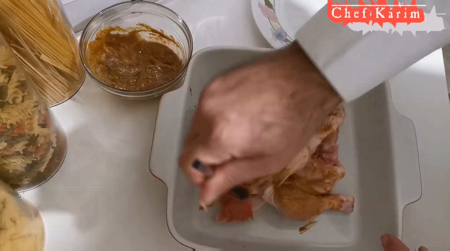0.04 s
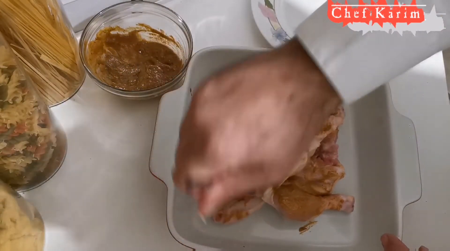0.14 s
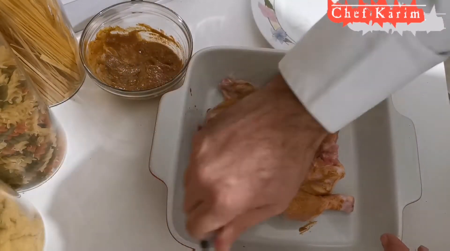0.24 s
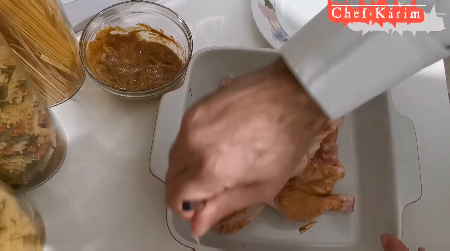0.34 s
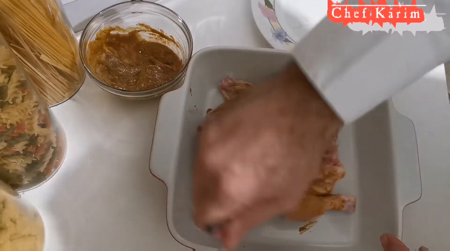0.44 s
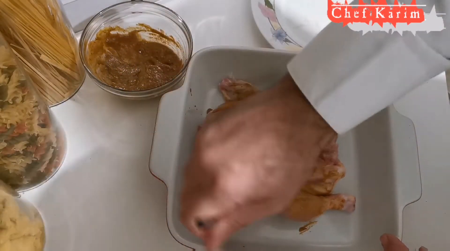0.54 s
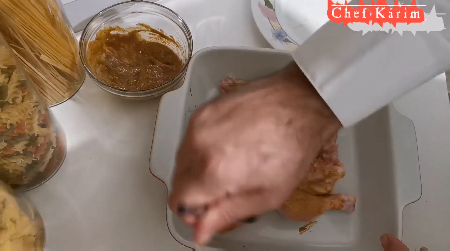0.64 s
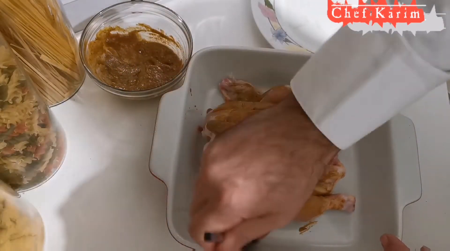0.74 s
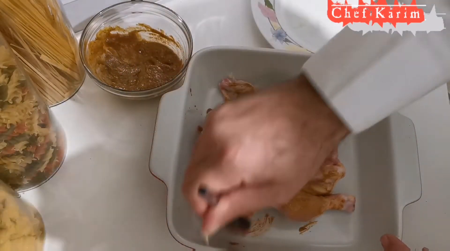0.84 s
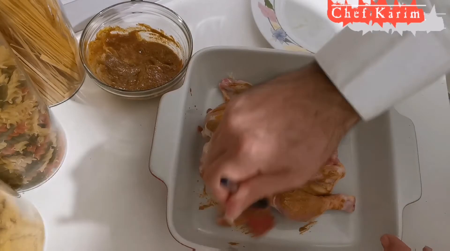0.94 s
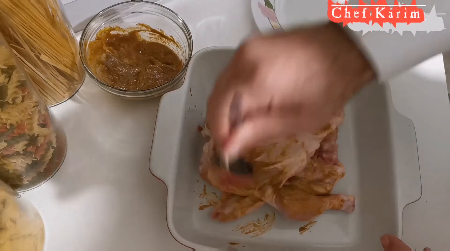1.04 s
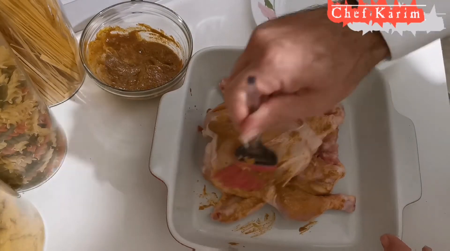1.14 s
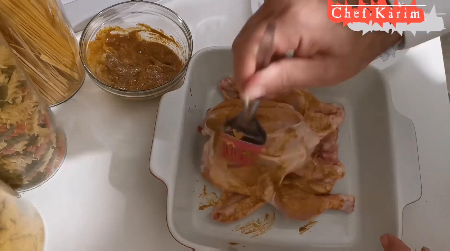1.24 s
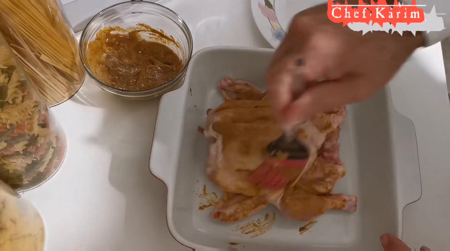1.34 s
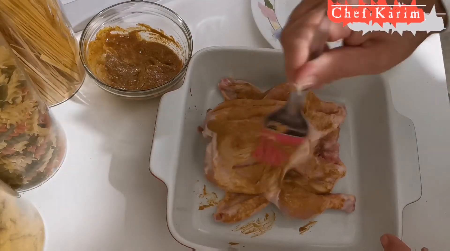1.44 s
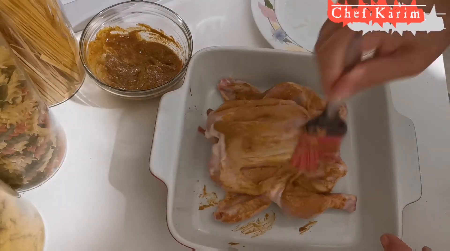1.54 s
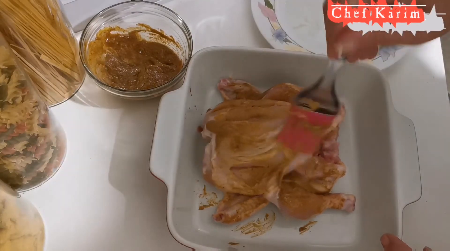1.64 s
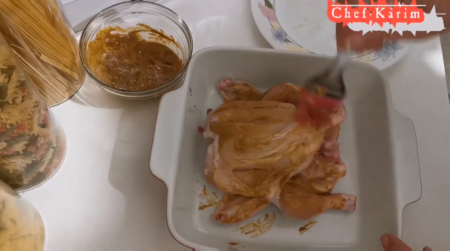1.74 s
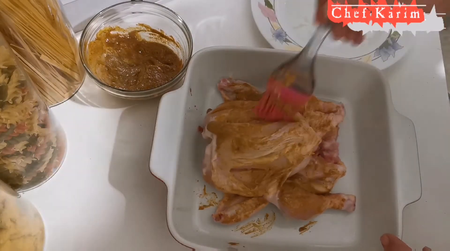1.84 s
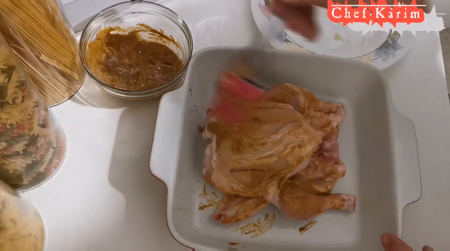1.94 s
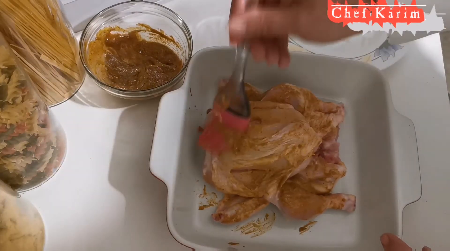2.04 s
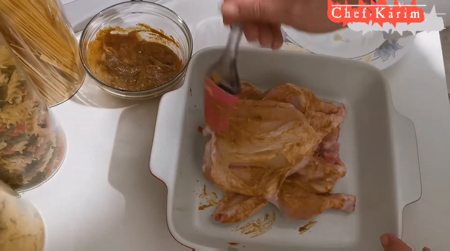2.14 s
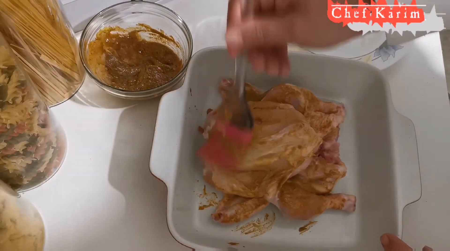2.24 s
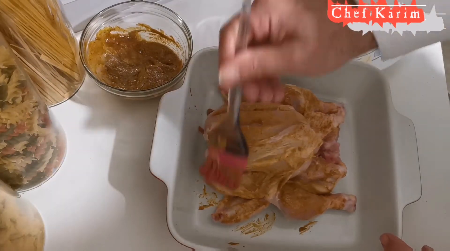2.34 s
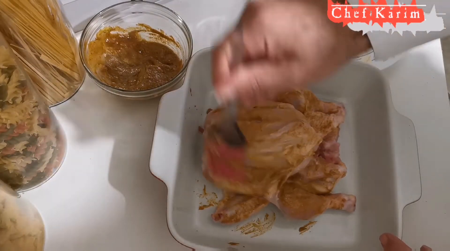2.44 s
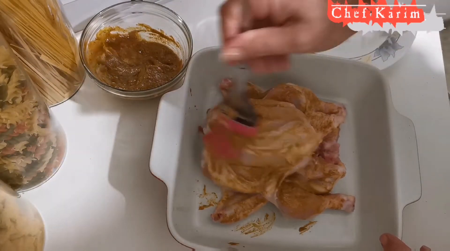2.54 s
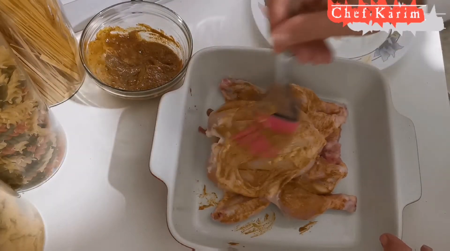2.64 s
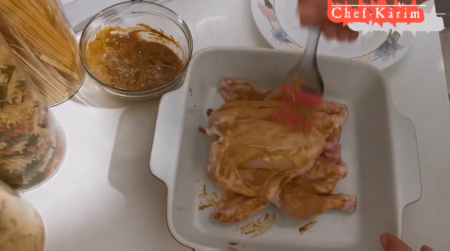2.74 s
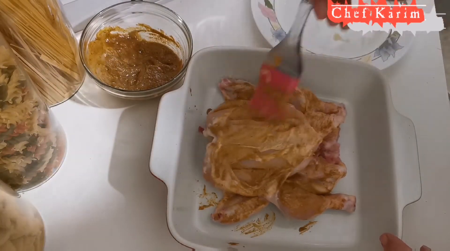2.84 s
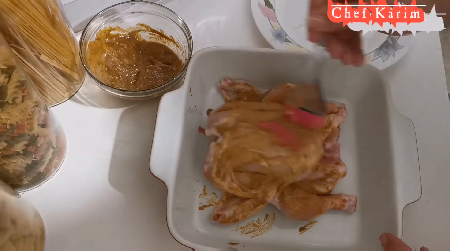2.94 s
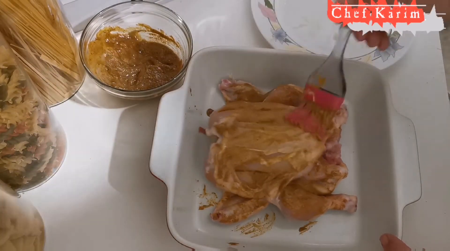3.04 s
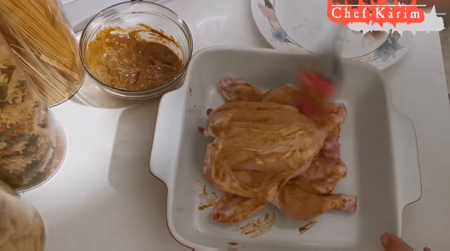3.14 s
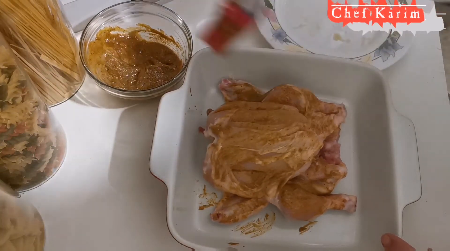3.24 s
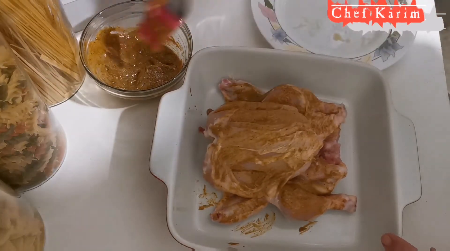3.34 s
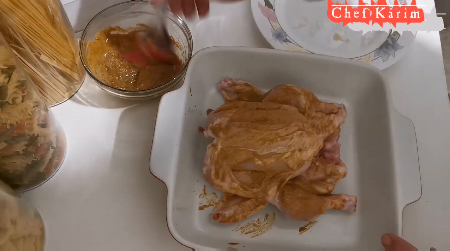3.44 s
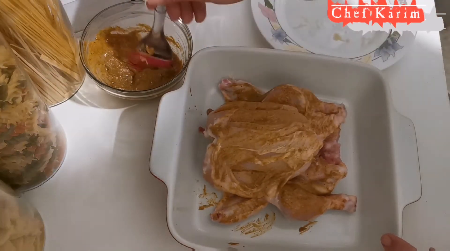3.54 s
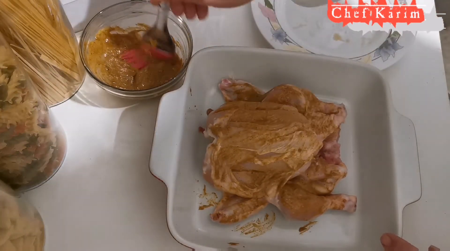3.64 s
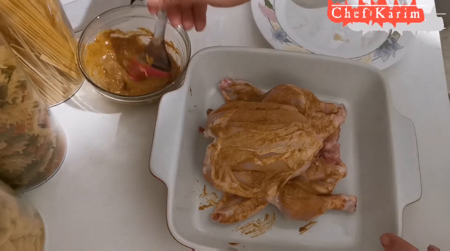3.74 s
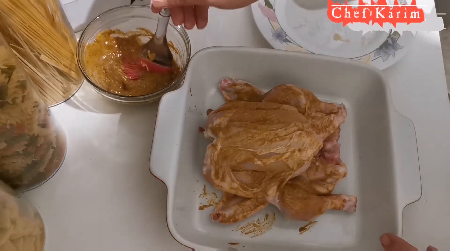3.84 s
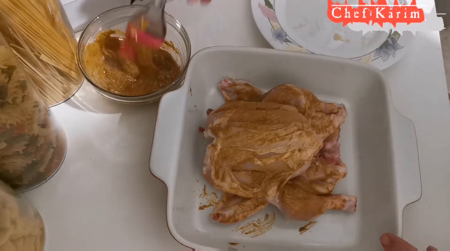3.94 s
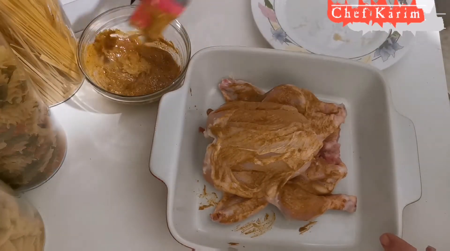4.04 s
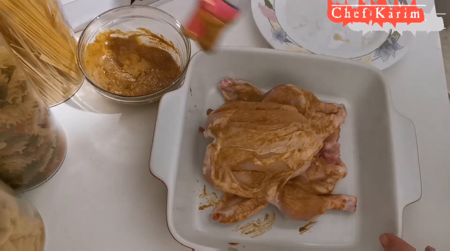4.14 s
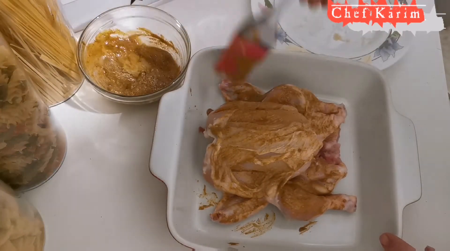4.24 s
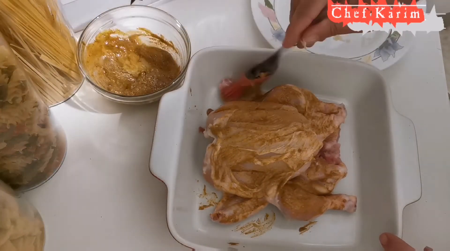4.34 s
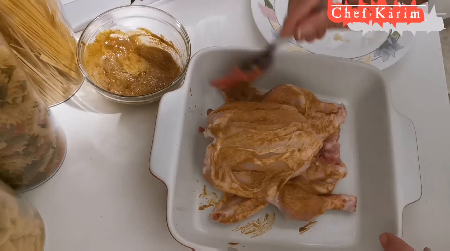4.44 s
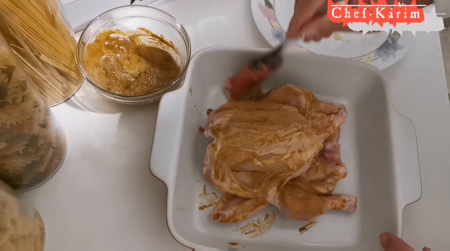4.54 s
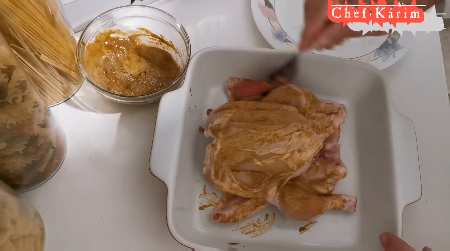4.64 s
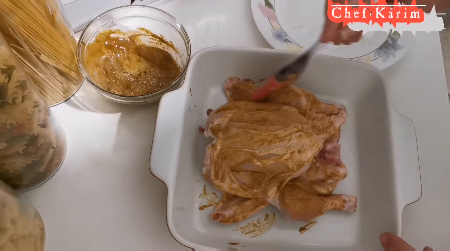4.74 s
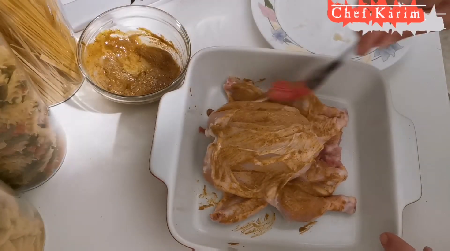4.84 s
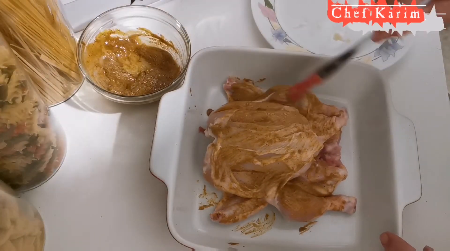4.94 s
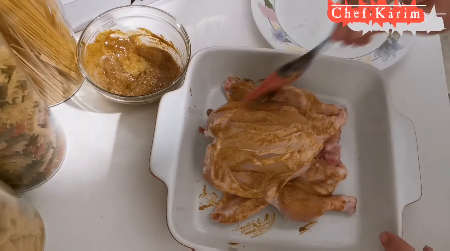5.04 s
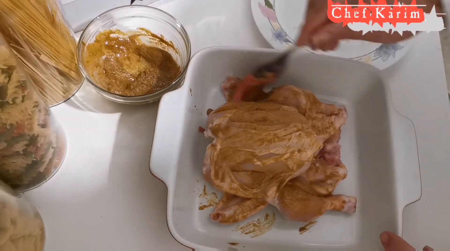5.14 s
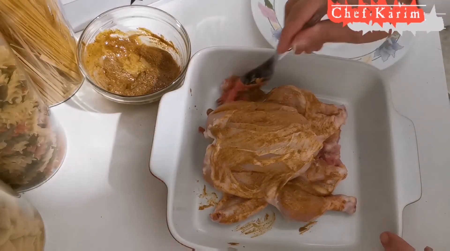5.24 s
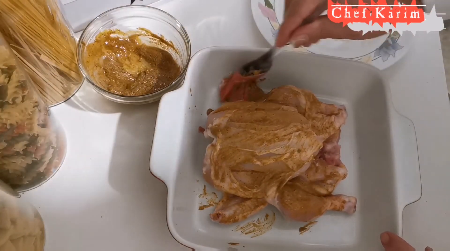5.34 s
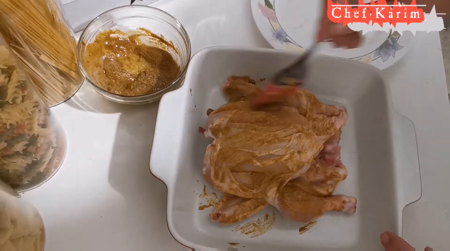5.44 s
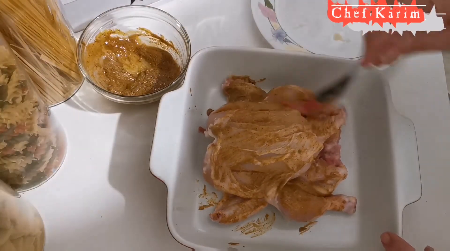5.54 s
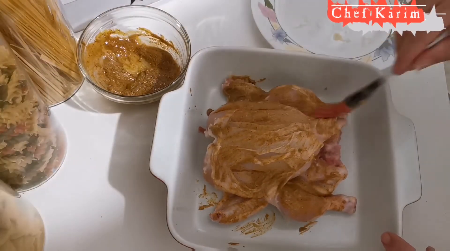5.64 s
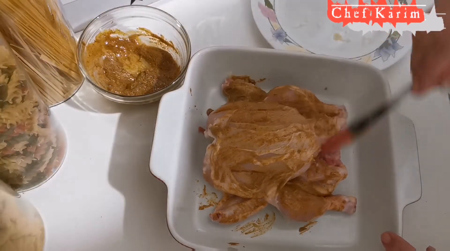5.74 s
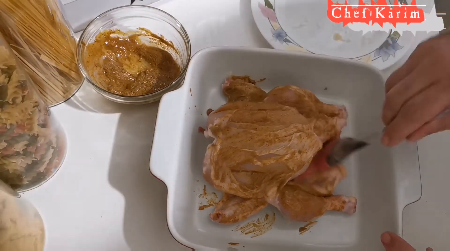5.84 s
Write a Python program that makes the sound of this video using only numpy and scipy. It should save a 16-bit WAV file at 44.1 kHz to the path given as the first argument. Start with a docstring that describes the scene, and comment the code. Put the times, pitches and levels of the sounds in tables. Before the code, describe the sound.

A brush works wet sauce over raw chicken with small sharp ticks, soft meaty thuds and a rattling double glass knock in a quiet kitchen.

```python
"""Sticky snaps and fine crackle come first: a silicone brush dabs wet marinade onto raw chicken in a ceramic dish.
Each snap is a short ringing cavity and a noise burst; the crackle is random tiny rings over a noise smear.
Air pockets plop as short damped notes, the meat thuds softly, and the brush handle taps and drags.
A glass bowl of sauce tips and knocks twice on the counter, as decaying modes of glass and counter under a rattle.
One close microphone, in mono, hears dish, bowl and counter in a small quiet kitchen with a low room tone."""
import sys
import numpy as np
from scipy import signal
from scipy.fft import rfft, irfft, next_fast_len
from scipy.io import wavfile
from scipy.ndimage import map_coordinates

SR = 44100
rng = np.random.default_rng(int(sys.argv[2]) if len(sys.argv) > 2 else 0)


def store_wav(level_fs):
    """Save 16-bit WAV to argv[1]."""
    pcm = np.round(np.clip(np.atleast_2d(level_fs), -1, 1) * 32767)
    wavfile.write(sys.argv[1], SR, pcm.T.astype(np.int16))


N = 259308
T = np.arange(SR // 2) / SR  # time since a contact (s)

# Event levels are nominal: each is set before its layers, soft onset and echoes.
# Loudest snaps of wet film: start_s, level_db, pitch_hz, width (share of the pitch)
FILM_SNAPS = [(0.0817, -38.5, 11500, 0.6), (0.185, -25.5, 5700, 0.78), (0.3993, -41.5, 3950, 0.43),
              (0.4326, -40.5, 4200, 0.68), (0.4733, -35, 4900, 0.56), (0.505, -31, 10260, 0.46),
              (0.5556, -46.5, 11400, 0.24), (0.6674, -51, 15100, 0.23), (0.6884, -36.5, 12200, 0.27),
              (0.701, -46.5, 6890, 0.12), (0.71, -40.5, 9300, 0.18), (0.7602, -58, 9100, 0.21),
              (0.792, -47, 6750, 0.11), (0.9089, -42, 6460, 0.63), (0.9293, -43, 13900, 0.55),
              (0.9373, -37.5, 6790, 0.26), (0.9496, -36, 8140, 1), (0.9745, -40, 10500, 1),
              (1.1542, -43.5, 4900, 0.65), (1.217, -43, 4630, 0.81), (1.2875, -47, 14300, 0.16),
              (1.321, -48, 11700, 0.18), (1.3554, -41, 7660, 1), (1.4266, -45, 7000, 1),
              (1.4552, -38.5, 9400, 1), (1.466, -40, 8450, 0.35), (1.5206, -49, 7330, 0.12),
              (1.536, -40, 4450, 0.34), (1.542, -47, 13000, 0.25), (1.5525, -58, 6500, 0.45),
              (1.5965, -56, 6630, 0.54), (1.636, -50, 12000, 0.34), (1.5706, -40.5, 6800, 0.074),
              (1.6104, -43, 6400, 0.085), (1.6425, -45, 9500, 0.2), (1.6528, -39.5, 7000, 0.28),
              (1.7132, -51, 4500, 0.31), (1.7222, -40, 6550, 0.15), (1.7268, -43, 6960, 0.14),
              (1.7362, -47, 7300, 0.27), (1.7598, -47.5, 9800, 0.16), (1.8966, -37.5, 11230, 0.43),
              (2.134, -41.5, 13400, 0.31), (2.3802, -43, 13060, 0.12), (2.463, -40, 8600, 0.27),
              (2.4742, -43, 10700, 0.19), (2.5326, -34, 14400, 0.14), (2.5676, -40.5, 5500, 1),
              (2.6265, -38.5, 5300, 0.41), (2.658, -54, 7330, 0.16), (2.6803, -44.5, 6700, 1),
              (2.878, -46, 8200, 0.18), (2.901, -38.5, 7500, 0.79), (3.1532, -46, 10600, 1),
              (3.2076, -49, 5700, 0.13), (3.239, -41, 12900, 0.26), (3.6559, -31, 15000, 0.34),
              (3.7509, -44, 7000, 0.25), (3.8143, -40.5, 10500, 0.72), (3.8625, -32, 6200, 0.085),
              (3.8742, -37.5, 6800, 0.2), (3.9303, -33.5, 6500, 0.21), (4.0229, -33, 6000, 0.47),
              (4.076, -33, 7400, 0.35), (4.097, -34.5, 6700, 0.3), (4.5225, -35, 5530, 0.22),
              (4.5316, -42, 4600, 0.16), (4.5533, -43.5, 7800, 0.25), (4.5835, -43.5, 9600, 0.22),
              (4.692, -35, 6400, 0.13), (4.7382, -41, 11530, 0.17), (4.754, -40.5, 5200, 0.94),
              (4.784, -47.5, 11200, 0.23), (4.8484, -32, 4520, 0.26), (4.9105, -44.5, 11700, 0.28),
              (4.9852, -34.5, 7100, 0.15), (5.3197, -38.5, 6800, 0.42), (5.3196, -43.5, 4500, 0.058),
              (5.3936, -36.5, 8200, 0.12), (5.4705, -51, 13500, 0.29), (5.5712, -50.5, 4550, 0.61),
              (5.612, -54, 11000, 0.24), (5.6349, -43.5, 10460, 0.79), (5.7568, -53, 10300, 0.32),
              (5.8147, -47.5, 10400, 0.32), (5.826, -47, 4300, 0.27)]
# Strokes of the brush through the sauce: start_s, length_s, level_db
BRUSH_STROKES = [(0, 0.083, -70.5), (0.194, 0.1, -73.5), (0.407, 0.13, -70), (0.66, 0.13, -67.5),
                 (0.914, 0.14, -74), (1.148, 0.21, -73), (1.442, 0.3, -77.5), (1.825, 0.13, -75),
                 (2.129, .14, -83.5), (2.335, 0.025, -77), (2.456, 0.24, -69.5), (2.812, 0.19, -73),
                 (3.134, 0.23, -75.5), (3.645, 0.073, -67.5), (4.076, 0.028, -63.5), (4.517, 0.026, -70),
                 (4.68, 0.047, -75), (4.846, 0.06, -65.5), (5.297, 0.49, -88), (5.605, 0.018, -75),
                 (5.759, 0.14, -77.5)]
# Air pockets opening in the sauce: start_s, level_db, pitch_hz
AIR_PLOPS = [(0.186, -43.5, 3040), (1.426, -54, 2270), (2.925, -51, 1670), (3.139, -59.5, 1910),
             (3.335, -52, 2480), (3.656, -56.5, 2000), (4.52, -54.5, 1675), (4.848, -46.5, 1550),
             (4.849, -41.5, 2220), (4.85, -45, 4600), (5.643, -56, 2900), (5.778, -58, 1900)]
# Meat pushed against the dish: start_s, level_db, push_pitch_hz, quiver_t60_s, counter_level_db
MEAT_THUDS = [(0.169, -42, 210, 0.2, -62), (0.692, -57, 150, 0.3, -76), (0.937, -46, 300, 0.2, -68),
              (0.9735, -32, 320, 0.32, -53), (1.150, -48, 290, 0.2, -67), (4.712, -50, 240, 0.2, -68),
              (4.735, -47, 250, 0.22, -66)]
# Light taps of the brush handle: start_s, level_db, pitch_hz, t60_s
HANDLE_TAPS = [(0.938, -57, 1300, 0.042), (.984, -44, 1345, 0.046), (0.987, -59, 2390, 0.089),
               (3.660, -52.5, 428, 0.1), (3.693, -39.5, 1371, 0.075), (3.693, -53, 2040, 0.0527),
               (3.732, -55, 528, .1), (3.815, -48, 2004, 0.056), (3.814, -53, 1330, 0.052),
               (5.641, -49.5, 1050, 0.048)]
# Bowl on the counter, tipped then dropped: start_s, glass_level_db, counter_level_db, clatter_level_db
BOWL_KNOCKS = [(3.8878, -38.5, -39, -37.5), (3.9637, -39, -39, -25.5)]
# Silicone dragging over meat and glass, and at 4.85 s a soft band trailing the snap there: start_s, length_s,
# centre_hz, level_db, width (share of the pitch)
BRUSH_DRAGS = [(1.893, 0.074, 2300, -68, 0.69), (2.48, 0.28, 610, -74.5, 0.19),
               (2.907, 0.045, 510, -63.5, 0.49), (3.665, 0.092, 430, -62, 0.28),
               (3.835, 0.061, 418, -60, 0.21), (4.849, 0.13, 2020, -65.5, .5),
               (5.63, 0.24, 820, -69.5, 0.64)]
# Low rubbing as the hand moves the meat: time_s, level_db
MEAT_RUB = [(0, -73.5), (.8, -71.5), (1.6, -75.5), (2.4, -77.5), (3.2, -71.5), (4.7, -77), (5.198, -104.5),
            (5.88, -70.5)]
# Faint low hums: start_s, length_s, pitch_hz, level_db, octave_level_db (relative to the hum)
LOW_HUMS = [(1.933, 0.28, 193.3, -64, -10), (4.735, 0.087, 168, -57.5, -35), (4.8, 0.19, 159.4, -64, -24)]

# Modes of the glass bowl: pitch_hz, tipped_db, dropped_db (relative levels), t60_s
GLASS_MODES = [(1306, 7, -10, .13), (1372, 1, -14, .1), (1446, 0, -12, .13), (1524, 0, 3, .12),
               (1585, 11, 11, .04), (1619, -3, 7, .2), (1690, -10, 0, .24), (1779, -14, 4, .23),
               (1862, -10, -7, .22), (1976, -20, -13, .25), (2396, 0, 2, .2), (2610, -26, -5, .19),
               (2755, -11, -8, .26), (2797, -18, 0, .26), (2848, -6, -12, .16), (2939, -16, -5, .27),
               (2996, -8, -12, .16), (3047, -14, -4, .25), (3110, -9, -14, .16), (3170, -18, -11, .3),
               (3325, -26, -9, .3), (3720, -30, -6, .2), (4872, -6, -12, .16), (4957, -3, -1, .2),
               (5103, -5, -1, .24), (5293, -26, -4, .24), (5377, -28, -6, .25), (7007, -22, -19, .24),
               (7302, -16, -12, .24), (10143, -24, -20, .25), (10603, -28, -12, .22)]
# Modes of the counter under it: pitch_hz, tipped_db, dropped_db, thud_db (relative levels), t60_s
COUNTER_MODES = [(69, -22, 3, 1, .32), (92, -22, -4, -6, .25), (127, 3, 4, 6, .32), (187, -10, 6, 5, .33),
                 (250, -9, 3, 6, .4), (332, -4, 8, -1, .33), (378, 4, 1, -2, .22), (440, 6, 4, -8, .19),
                 (463, -8, 5, -10, .27), (505, -6, -2, -16, .25), (544, -5, -1, -22, .2),
                 (614, -14, 3, -15, .3), (672, 3, 5, -9, .12), (716, -20, -6, -36, .25),
                 (771, -22, -1, -38, .22), (797, -22, -7, -38, .28), (850, -22, -1, -40, .18),
                 (937, -22, -3, -36, .29), (1060, -16, -10, -44, .2), (1179, -22, -2, -44, .33)]

# Relative spectra. Dense rattle of glass on the counter: pitch_hz, density_db (per Hz)
CLATTER_SPECTRUM = [(50, -31), (130, -5), (450, -1), (1000, -4), (1650, -3), (2150, -15.5), (3000, -10),
                    (4100, -25), (5100, -6.5), (6000, -26.5), (7400, -16.5), (9000, -42.5), (10500, -22),
                    (12000, -37), (16000, -30)]
# Meat in the dish: pitch_hz, density_db (per Hz)
FLESH_SPECTRUM = [(30, -22), (70, -2), (150, -2), (330, -7), (450, -13), (700, -26), (1000, -32),
                  (2000, -32), (6000, -75)]
# Breaking films of sauce: pitch_hz, density_db (per Hz)
WET_SPECTRUM = [(100, -53.5), (300, -24), (700, -12), (1500, -7), (3200, -4), (4800, -1), (7000, 2),
                (9000, -.5), (11000, 1), (13000, -2), (16000, -1)]
# Room tone: pitch_hz, density_db (per Hz)
AIR_SPECTRUM = [(25, 0), (45, -5), (70, -3), (150, -8), (270, -18), (600, -20), (1200, -25), (2300, -24),
                (3800, -29), (5500, -28), (8000, -36), (11000, -34), (16000, -40)]
# Decay of the kitchen's tail: pitch_hz, t60_s
KITCHEN_DECAY = [(100, 0.35), (500, 0.28), (2000, 0.33), (6000, 0.28), (15000, 0.16)]

SNAP_T60_S, TICK_T60_S, FIZZ_T60_S = 0.0041, 0.0045, 0.18  # cavity, burst and lingering fizz of a snap
CRACK_DB, CRACK_T60_S = 4, 0.0018  # first crack of a film, relative to its burst
PRESS_S, LIFT_DB_PER_S = 0.00077, 241  # the bristles land quickly, and let go as the brush lifts
SETTLE_DB = -89.5  # sauce still ticking between strokes
THREADS_PER_S, CLUMP_DB, THREAD_SPREAD_DB = 150, 6.5, 5  # typical rate, bunching, range of size
THREAD_DB, SMEAR_DB = 0.5, -6.5  # relative to the stroke
PLOP_CYCLES = 48  # cycles for a plop to fall by 60 dB
DISH_HZ, DISH_DB, DISH_T60_S = 142, -7, 0.07  # dish bouncing on the counter, relative to the thud
TOP_HZ = 16100  # upper band limit


def snaps():
    """A film breaks with a sharp crack: its tiny cavity pops in a burst around its pitch, over a faint broad tick."""
    out = np.zeros(N)
    for start_s, level_db, hz, width in FILM_SNAPS:
        cavity = sine(hz) * fade(SNAP_T60_S)
        tick = coloured(hiss(), WET_SPECTRUM)
        burst = amp(-4.5) * rasp(hz, width) + amp(-10) * tick
        crack = amp(CRACK_DB) * fade(CRACK_T60_S)
        fizz = amp(-30) * fade(FIZZ_T60_S)
        shape = crack + fade(TICK_T60_S) + fizz
        film = (amp(-2.5) * cavity + burst * shape) * onset(0.003)
        add(out, start_s, kitchen(amp(level_db + 1.5) * film, near_db=-1, room_db=-5.5))
    return out


def crackle():
    """Small threads of sauce part under the bristles, in clumps and each at its own pitch, over a faint smear."""
    chance = THREADS_PER_S / SR * amp(CLUMP_DB * wobble(25))  # per sample
    threads = np.zeros(N)
    for i in np.flatnonzero(rng.random(N) < chance):
        hz, cycles = rng.uniform([4500, 1], [15500, 4])
        size_db = THREAD_SPREAD_DB * min(rng.exponential(), 3)
        add(threads, i / SR, amp(size_db) * pop(hz, cycles) / np.sqrt(cycles))
    smear = coloured(rng.standard_normal(N), WET_SPECTRUM) * amp(4.5 * wobble(60))
    sauce = amp(THREAD_DB) * unit(threads) + amp(SMEAR_DB) * smear
    return kitchen(pressure() * sauce, near_db=0.5, room_db=-9)


def pressure():
    """How hard the bristles work the sauce: each stroke presses, holds and lifts."""
    t = np.arange(N) / SR
    effort = np.full(N, amp(SETTLE_DB))
    for start_s, length_s, level_db in BRUSH_STROKES:
        press = np.clip((t - start_s) / PRESS_S, 0, 1)
        lifted_s = np.maximum(t - start_s - length_s, 0)
        effort += press * amp(level_db - LIFT_DB_PER_S * lifted_s)
    return effort


def pop(hz, cycles):
    """A tiny cavity rings for a few cycles."""
    turns = hz * T[:SR // 100]
    return np.sin(2 * np.pi * turns) * np.exp(-turns / cycles) * (1 - np.exp(-turns))


def plops():
    """Trapped air rings briefly as the brush pulls free, with a wet rasp around its pitch."""
    out = np.zeros(N)
    for start_s, level_db, hz in AIR_PLOPS:
        pocket = amp(-2) * sine(hz) + amp(-1) * rasp(hz, width=0.2)
        plop = amp(level_db) * pocket * fade(PLOP_CYCLES / hz) * onset(0.004)
        add(out, start_s, kitchen(plop, near_db=-12, room_db=-8))
    return out


def thuds():
    """Soft meat takes the blow: a push and a damped quiver; the dish bounces and the counter's low modes rumble on."""
    out = np.zeros(N)
    for start_s, level_db, hz, quiver_t60, counter_db in MEAT_THUDS:
        push = sine(hz) * fade(0.028)
        dish = amp(DISH_DB) * sine(DISH_HZ) * fade(DISH_T60_S)
        quiver = amp(-17) * coloured(hiss(), FLESH_SPECTRUM) * fade(quiver_t60)
        counter = amp(counter_db) * ring(struck(COUNTER_MODES, index=2), blur=0.13)
        add(out, start_s, (amp(level_db) * (push + dish + quiver) + counter) * onset(0.012))
    muffled = filtered(out, lambda f: 1 / (1 + (f / 850) ** 6))
    return kitchen(muffled, near_db=-20, room_db=-16)


def clinks():
    """The brush handle taps the dish or bowl: one damped note and a short rattle, with the rim barely ringing."""
    out = np.zeros(N)
    for start_s, level_db, hz, t60 in HANDLE_TAPS:
        note = amp(-2) * sine(hz) * fade(t60)
        rattle = amp(-8) * rasp(hz, width=0.2) * fade(0.03)
        rim = amp(-32) * ring(struck(GLASS_MODES, index=1), blur=0.16)
        add(out, start_s, amp(level_db) * (note + rattle + rim) * onset(0.006))
    return kitchen(out, near_db=-22, room_db=-16)


def bowl():
    """The bowl is tipped, then drops back: each blow favours its own modes of glass and counter, over a short rattle."""
    out = np.zeros(N)
    for blow, (start_s, glass_db, counter_db, clatter_db) in enumerate(BOWL_KNOCKS):
        glass = amp(glass_db) * ring(struck(GLASS_MODES, blow), blur=0.16)
        counter = amp(counter_db) * ring(struck(COUNTER_MODES, blow), blur=0.13)
        rattle = amp(-2) * fade(0.075) + amp(-9) * fade(0.28)
        clatter = amp(clatter_db) * coloured(hiss(), CLATTER_SPECTRUM) * rattle
        add(out, start_s, (glass + counter + clatter) * onset(0.003))
    return kitchen(out, near_db=-20, room_db=-16)


def drags():
    """The bristles drag softly, and one snap trails off: noise in a band around one pitch swells and fades."""
    out = np.zeros(N)
    for start_s, length_s, hz, level_db, width in BRUSH_DRAGS:
        add(out, start_s, amp(level_db) * swell(length_s) * rasp(hz, width))
    return out


def handling():
    """The meat shifts with a low rub; now and then a faint hum swells and fades."""
    level_db = np.interp(np.arange(N) / SR, *np.transpose(MEAT_RUB))
    rub = amp(level_db) * coloured(rng.standard_normal(N), FLESH_SPECTRUM)
    for start_s, length_s, hz, hum_db, octave_db in LOW_HUMS:
        hum = sine(hz) + amp(octave_db) * sine(2 * hz)
        add(rub, start_s, amp(hum_db) * swell(length_s) * hum)
    return rub


def room_tone():
    """A low, slightly restless rumble with faint hiss."""
    drift = amp(0.8 * wobble(5))
    return amp(-68) * drift * coloured(rng.standard_normal(N), AIR_SPECTRUM)


def kitchen(x, near_db, room_db):
    """x with quick echoes from the dish and counter, then the room's tail."""
    hz, t, z = signal.stft(hiss(), SR, nperseg=256)
    decay = np.exp(-np.log(1000) * t / along(KITCHEN_DECAY, hz)[:, None])
    tail = signal.istft(z * decay, SR, nperseg=256)[1][:len(T)]
    tail = tail * onset(0.13)
    near = hiss() * fade(0.029) * onset(0.0048)
    # each part is scaled to its own total energy, relative to the direct sound
    echoes = amp(near_db) * near / np.linalg.norm(near) + amp(room_db) * tail / np.linalg.norm(tail)
    return x + signal.fftconvolve(x, echoes)[:len(x)]


def ring(modes, blur):
    """Decaying modes of alternating sign; chattering contact makes their phases wander."""
    out = np.zeros(len(T))
    for k, (hz, db, t60) in enumerate(modes):
        wander = blur * np.sqrt(hz / SR) * np.cumsum(hiss())
        out += (-1) ** k * amp(db) * fade(t60) * np.sin(2 * np.pi * hz * T + wander)
    return out


def struck(modes, index):
    """The (Hz, dB, t60) modes as one kind of blow excites them: 0 tipping, 1 dropping, 2 a soft thud."""
    return [(hz, levels[index], t60) for hz, *levels, t60 in modes]


def rasp(hz, width):
    """Noise of rms 1 around a pitch; width is a share of that pitch."""
    return unit(filtered(hiss(), lambda f: 1 / (1 + (np.log((f + 1) / hz) / width) ** 2)))


def hiss():
    """White noise as long as one contact."""
    return rng.standard_normal(len(T))


def sine(hz):
    """A steady tone as long as one contact."""
    return np.sin(2 * np.pi * hz * T)


def fade(t60):
    """Exponential decay after a contact, 60 dB in t60 seconds."""
    return np.exp(-np.log(1000) * T / t60)


def onset(t60):
    """A soft start: the complement of a decay."""
    return 1 - fade(t60)


def swell(length_s):
    """A smooth rise and fall."""
    return np.sin(np.pi * np.minimum(T / length_s, 1))


def wobble(rate):
    """A smooth random curve, rate knots a second."""
    knots = rng.standard_normal(int(N * rate / SR) + 4)
    return map_coordinates(knots, [np.arange(N) * rate / SR])


def coloured(x, spectrum):
    """x given a spectrum, at rms 1."""
    return unit(filtered(x, lambda hz: amp(along(spectrum, hz))))


def filtered(x, response):
    """x times a response of frequency."""
    m = next_fast_len(len(x) + 8192)
    return irfft(rfft(x, m) * response(np.fft.rfftfreq(m, 1 / SR)), m)[:len(x)]


def along(points, hz):
    """(Hz, value) points joined on a log axis."""
    f, v = np.transpose(points)
    return np.interp(np.log(hz + 1), np.log(f), v)


def amp(db):
    """Decibels to gain."""
    return 10 ** (np.asarray(db) / 20)


def unit(x):
    """Scale to rms 1."""
    return x / np.sqrt(np.mean(x ** 2) + 1e-20)


def add(track, start_s, sound):
    """Mix a sound into the track at a time in seconds."""
    part = track[max(round(start_s * SR), 0):][:len(sound)]
    part += sound[:len(part)]


def scene():
    """Everything at one microphone above the dish."""
    brush = snaps() + crackle() + plops() + clinks() + drags()
    meat_and_bowl = thuds() + bowl() + handling()
    return (brush + meat_and_bowl + room_tone())[None]


def record(dry):
    """The microphone's signal keeps nothing above its band limit."""
    return np.array([filtered(channel, lambda hz: hz < TOP_HZ) for channel in dry])


dry = scene()
out = record(dry)
store_wav(out)
```